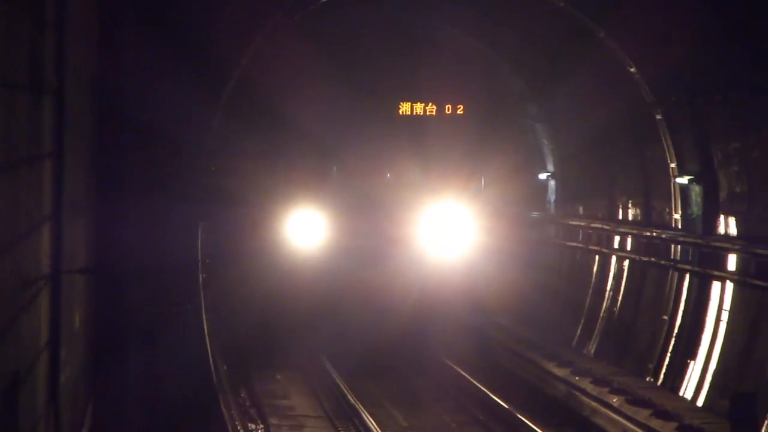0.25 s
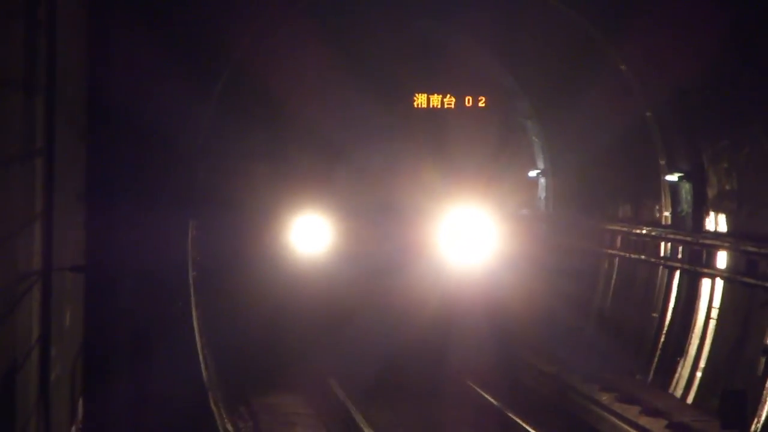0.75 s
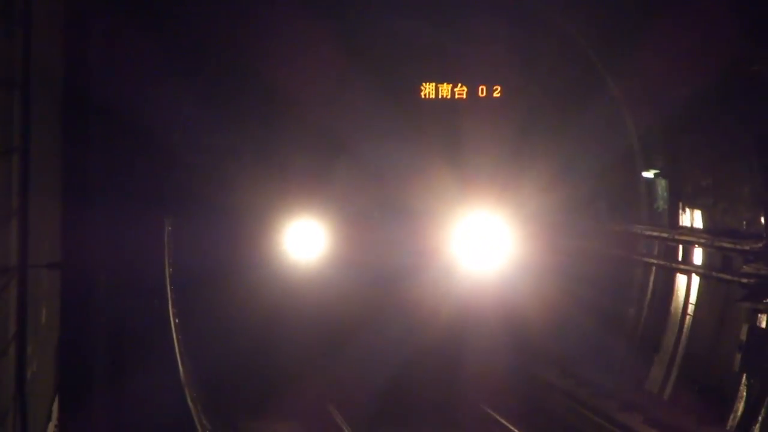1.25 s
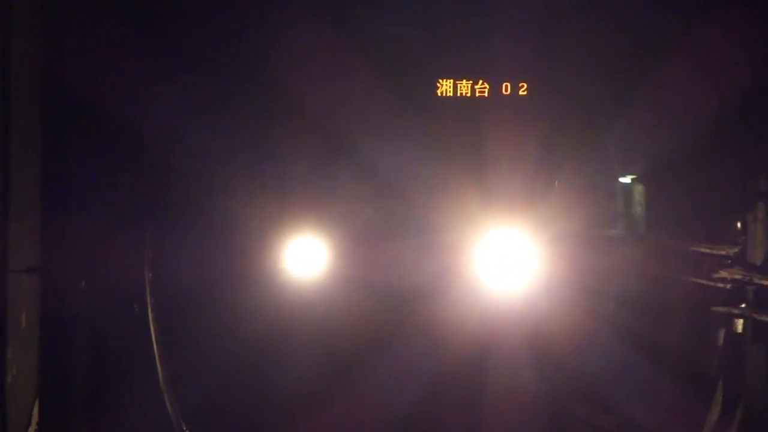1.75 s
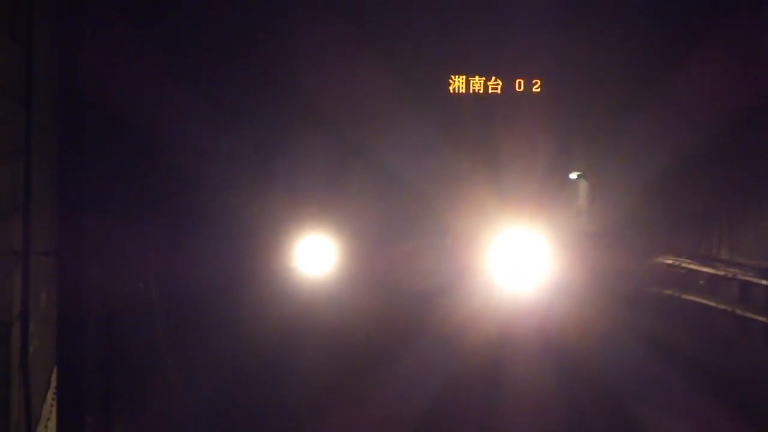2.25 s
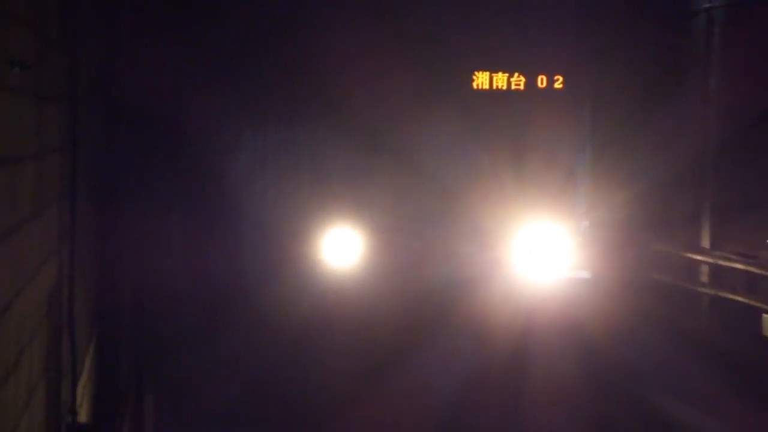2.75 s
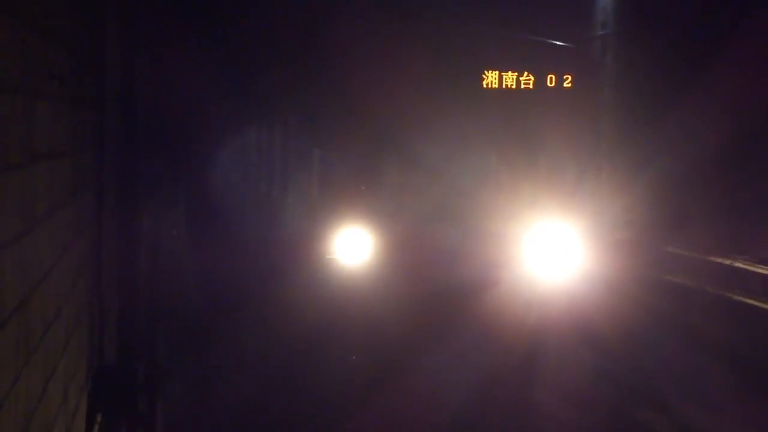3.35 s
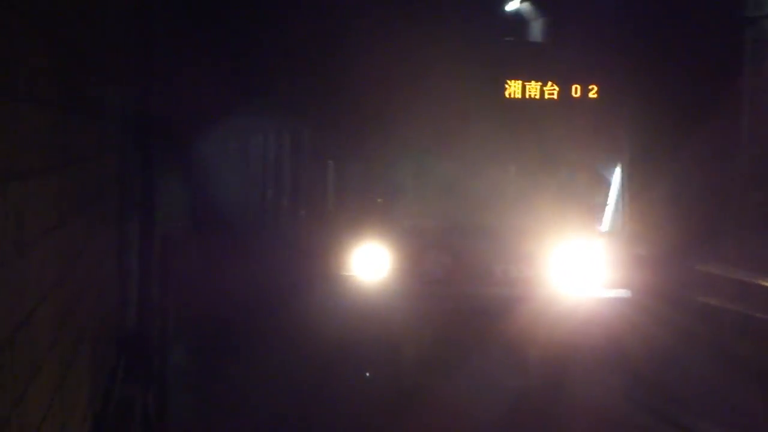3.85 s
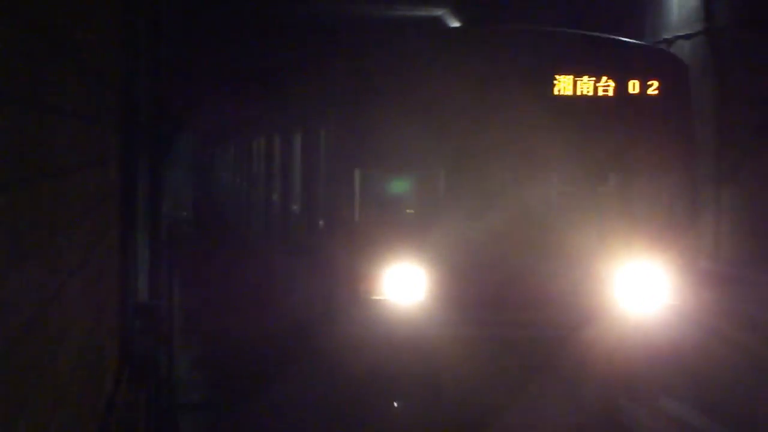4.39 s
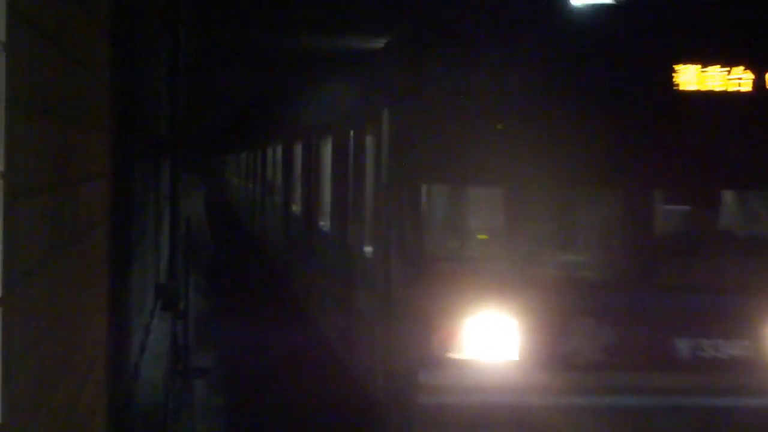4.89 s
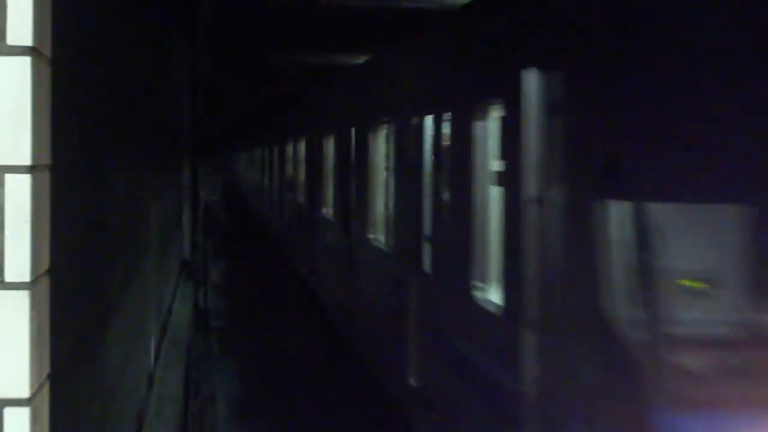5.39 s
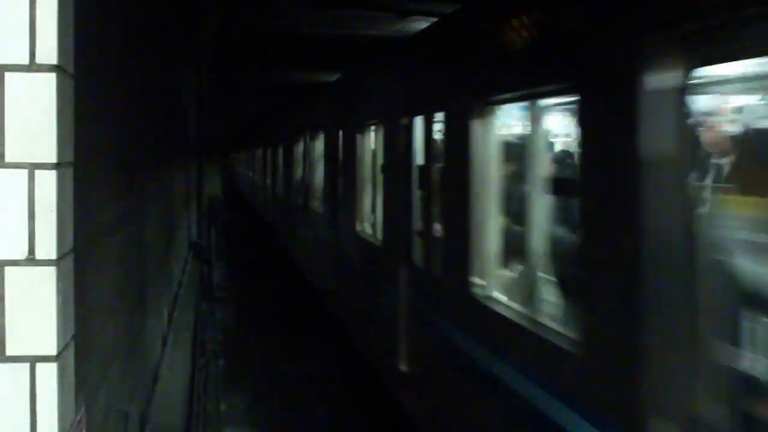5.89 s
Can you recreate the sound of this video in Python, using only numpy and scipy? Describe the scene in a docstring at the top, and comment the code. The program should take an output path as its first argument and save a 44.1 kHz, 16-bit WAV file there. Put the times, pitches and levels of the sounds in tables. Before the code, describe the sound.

An electric subway train approaches through a tunnel with a steady, hollow roar of wheels and ringing rails. Its motor whine sinks slightly as it slows, and the wheels knock now and then on rail joints. Near the end, as the first car passes, the brakes sizzle and chirp in quick high pulses. The microphone is at the end of the platform, buffeted throughout by irregular gusts of air.

```python
"""An underground station, at the end of the platform: an electric train rolls out of the tunnel.
Rough steel sets track, rails and wheels roaring and excites the tunnel's modes; wheels knock on joints.
The motor whine sinks as the train slows. Friction makes the brakes sizzle, and chirp once per wheel
turn, loudest as the first car goes by. Air pushed ahead of the train buffets the microphone, and
the strong gusts make its automatic gain control turn everything down."""
import sys
import numpy as np
from scipy import signal
from scipy.fft import rfft, irfft
from scipy.io import wavfile
from scipy.ndimage import uniform_filter1d

SR = 44100
rng = np.random.default_rng(int(sys.argv[2]) if len(sys.argv) > 2 else 0)


def materialize(psi):
    """Save the field psi as 16-bit PCM at rate SR to the path in sys.argv[1].

    A 1-D psi becomes a single channel; in a 2-D psi each row is a channel.
    """
    bounded = np.clip(np.atleast_2d(psi).T, -1, 1)
    quanta = np.round(bounded * 32767).astype(np.int16)
    wavfile.write(sys.argv[1], SR, quanta)


N = 270333
TIME = np.arange(N) / SR
FREQ = np.maximum(np.arange(N // 2 + 1) * SR / N, 1)


# spectrum of the rolling noise: (frequency [Hz], spectral level [dB])
ROAR_SPECTRUM = [(180, -19), (300, -15), (353, -9.5), (410, -11.5), (464, -6), (510, -6.5), (705, -4),
                 (813, -0.5), (920, -2), (1080, -2.5), (1210, -7.5), (1560, -10), (1870, -5.5),
                 (2380, -14.5), (2900, -30.5), (3770, -52), (6380, -120)]
def rolling(track_top_hz=720, rail_top_hz=1400, flutter_db=0.5):
    """Roughness excitation: the track bed radiates the lows, the rails the middle, the wheels the top."""
    roar = colour(ROAR_SPECTRUM, skirt_db=16) * tunnel()
    low, middle = below(track_top_hz), below(rail_top_hz)
    track = from_db(exposed_level(-7, 5.56)) * noise(roar * np.sqrt(low))
    rails = from_db(-2.5) * noise(roar * np.sqrt(middle * (1 - low)))
    wheels = from_db(exposed_level(-14.34, 7.8)) * noise(roar * np.sqrt(1 - middle)) * pan(-1)
    return (track + rails + wheels) * from_db(roar_level() + flutter_db * drift(27))


# slow course of the rolling noise: (time [s], level [dB])
ROAR_LEVELS = [(0, -16.5), (.22, -15), (.7, -15), (.9, -17.5), (1.2, -17), (2.0, -16.5), (2.3, -17.5),
               (2.65, -16), (3.2, -15), (3.55, -18), (4.1, -19.5), (4.35, -17.5), (4.65, -20.5),
               (5.35, -19.5), (6.13, -20)]
# patches of uneven rail: (time [s], level change [dB])
ROUGH_PATCHES = [(.69, -1), (1.19, 3.5), (1.66, 2), (1.941, 1.5), (2.41, 1.5), (3.84, 1), (4.36, -0.5),
                 (4.52, 1), (4.8, 3), (4.98, 1), (5.13, 1), (5.305, 2), (5.38, 1)]
def roar_level(half_length_s=0.043):
    """Rolling noise follows roughness: each patch briefly shifts its level, given in dB."""
    level, = in_time(ROAR_LEVELS)
    return level + sum(db * np.exp(-((TIME - s) / half_length_s) ** 2) for s, db in ROUGH_PATCHES)


# how openly the wheels are heard: (time [s], exposure [0-1])
WHEEL_EXPOSURE = [(0, 0.03), (2.4, 0.16), (3.4, 0.16), (3.9, 0.52), (4.35, 0.84), (4.7, 0.66), (5.05, 0.85),
                  (6.13, 0.88)]
def exposed_level(hidden_db, gained_db):
    """Exposure of a source: a level in dB that rises as the wheels are heard more openly."""
    exposure, = in_time(WHEEL_EXPOSURE)
    return hidden_db + gained_db * exposure


# cross modes of the tunnel: (frequency [Hz], bandwidth [Hz], gain [dB])
TUNNEL_MODES = [(232, 35, 3.5), (350, 20, 1.5), (459, 22, 0.5), (600, 110, 1.5), (808, 42, 2),
                (860, 55, 1.5), (1166, 61, 2), (2443, 190, 3.5)]
def tunnel():
    """Standing waves across the tube raise peaks in the echo-rippled frequency response."""
    return echoes() * from_db(sum(db * resonance(hz, width) for hz, width, db in TUNNEL_MODES))


# two groups of motors: (time [s], lower pitch [Hz], lower group level [dB], upper group level [dB])
MOTOR_WHINE = [(0, 815, -47, -52), (.65, 803, -33.5, -44), (1.2, 794, -37, -46), (2.3, 800, -35, -48),
               (2.7, 789, -28.5, -42), (3.4, 781, -32, -37), (3.9, 765, -28.5, -38), (4.6, 746, -33, -30.5),
               (5.4, 711.2, -34, -29.5), (6.13, 706, -32.5, -32)]
def motors(upper_ratio=1.117, gain_db=2.5):
    """Pitch is proportional to shaft speed: both groups sink together, and the upper one takes over."""
    hz, lower_db, upper_db = in_time(MOTOR_WHINE)
    lower = from_db(lower_db) * whine(hz, spread=.012, fading_hz=15)
    upper = from_db(upper_db) * whine(hz * upper_ratio, spread=.014, fading_hz=20)
    return from_db(gain_db) * (lower + upper)


def whine(hz, spread, fading_hz, count=3):
    """Multipath fading: tunnel echoes make the tones of slightly detuned motors swell and fade."""
    out = 0
    for offset in np.linspace(-1, 1, count):
        phase = 2 * np.pi * np.cumsum(hz * (1 + spread * offset)) / SR
        out += drift(fading_hz) * np.sin(phase) + drift(fading_hz) * np.cos(phase)
    return evened(np.array([out, out]), window_s=0.37)


# wheels striking rail joints: (time [s], level [dB], pitch [Hz])
JOINT_IMPACTS = [(1.198, -12.5, 850), (1.265, -13, 850), (3.229, -12.5, 721.5), (3.258, -14, 720),
                 (3.304, -16, 720), (3.35, -14, 800), (3.421, -13, 720), (3.832, -14, 730),
                 (3.943, -13, 760), (4.967, -15, 721), (5.088, -12, 710), (5.315, -10.5, 593.5),
                 (5.339, -18, 602), (5.697, -14, 720)]
def knocks(width_hz=600, attack_s=0.0022, decay_s=0.013):
    """Impact excitation: a wheel drops over a joint and rings with the track, heavily damped."""
    track = np.sqrt(colour(ROAR_SPECTRUM, skirt_db=26))
    out = 0
    for s, db, hz in JOINT_IMPACTS:
        age = np.maximum(TIME - s, 0)
        blow = from_db(db) * np.minimum(age / attack_s, 1) * np.exp(-age / decay_s)
        out += blow * evened(noise(resonance(hz, width_hz) * track), window_s=0.014)
    return out


# pressure of the eddies: (frequency [Hz], spectral level [dB])
WIND_SPECTRUM = [(15, -70), (25, -49), (54, -39), (92, -15), (149, -5), (230, -1), (366, -2.5), (697, -8.5),
                 (798, -11.5), (900, -12), (1170, -27), (1980, -120)]
# likeness of the wind in left and right: (frequency [Hz], correlation [-1 to 1])
WIND_CORRELATION = [(60, -0.15), (150, -0.76), (500, -0.38)]
def wind(gain_db=3.5, lumps_db=2.5, lumps_hz=30):
    """Turbulent pressure: eddies push the two microphone ports mostly in antiphase."""
    eddies = evened(noise(colour(WIND_SPECTRUM, skirt_db=16), WIND_CORRELATION), window_s=0.12)
    return airflow() * from_db(gain_db + lumps_db * drift(lumps_hz)) * eddies * pan(-1.86)


# gusts at the microphone: (start [s], duration [s], level [dB])
AIR_GUSTS = [(0.0, 0.037, -24), (0.3, 0.072, -29.5), (0.524, 0.08, -26), (0.793, 0.098, -22),
             (0.958, 0.042, -25), (1.302, 0.061, -30), (1.404, 0.033, -19.5), (1.535, 0.024, -21.5),
             (1.708, 0.058, -19), (1.905, 0.069, -31), (2.089, 0.034, -21), (2.199, 0.042, -17.5),
             (2.402, 0.034, -19.5), (2.527, 0.068, -29), (2.683, 0.059, -29), (3.04, 0.051, -33),
             (3.204, 0.031, -31), (3.37, 0.1, -29), (3.48, 0.11, -24.5), (3.676, 0.1, -29),
             (3.876, 0.024, -21.5), (4, 0.15, -25.5), (4.442, 0.042, -23.5), (4.528, 0.16, -20.5),
             (4.758, 0.034, -20.5), (4.827, 0.029, -25.5), (5.07, 0.18, -23.5), (5.336, 0.046, -22),
             (5.492, 0.065, -32.5), (5.705, 0.016, -29.5), (5.921, 0.12, -30)]
def airflow(draught_db=-40.5, attack_s=0.06, release_s=0.039):
    """Piston effect: the train drives gusts and a steady draught ahead of it; their powers add."""
    amplitude = from_db(draught_db)
    for start, length, db in AIR_GUSTS:
        attack = np.clip((TIME - start) / attack_s + 1, 0, 1)
        release = np.exp(-np.maximum(TIME - start - length, 0) / release_s)
        amplitude = np.hypot(amplitude, from_db(db) * attack * release)
    return amplitude


# rubbing of the brake shoes: (time [s], level [dB])
BRAKE_LEVELS = [(0.05, -64), (1.06, -63.5), (1.23, -60), (1.84, -59), (2.6, -53.5), (3.15, -50),
                (3.55, -58.5), (4.46, -56), (4.76, -51.5), (4.81, -41.5), (4.87, -43), (4.99, -39),
                (5.49, -40.5), (5.66, -37.5), (5.78, -37.5), (5.88, -37.5), (6.1, -37.5)]
# high modes of the shoes: (frequency [Hz], spectral level [dB])
SIZZLE_SPECTRUM = [(6500, -23.5), (7600, -7), (8300, -6), (9000, -2), (9600, 1), (10100, -4.5),
                   (10700, -17), (11400, -28)]
def brake_sizzle(walls, gain_db=4, grain_db=0.9):
    """Sliding friction drives the high modes of the brake shoes with grainy noise."""
    level, = in_time(BRAKE_LEVELS)
    envelope = from_db(level + gain_db + grain_db * drift(40))
    return envelope * noise(walls * colour(SIZZLE_SPECTRUM, skirt_db=50)) * pan(-1.6)


# chirping modes of the shoes: (frequency [Hz], bandwidth [Hz], lag [turns], level [dB])
CHIRP_MODES = [(7330, 600, 0.0, 3.5), (7800, 600, 0.28, -3.5), (9300, 770, 0.42, 3), (10260, 450, 0.5, -7)]
def brake_chirps(cycles_per_turn=142.5, catch_s=4.895, peak_turns=.22, slip_turns=.04, rise_per_s=.045):
    """Periodic friction: once per turn the wheel's high spot catches each mode of the shoes."""
    motor_hz, *_ = in_time(MOTOR_WHINE)
    braking_db, = in_time(BRAKE_LEVELS)
    turns = np.cumsum(motor_hz) / SR / cycles_per_turn
    turns -= np.interp(catch_s, TIME, turns)   # the high spot meets the shoe at catch_s
    climb = rise_per_s * np.maximum(TIME - catch_s, 0)   # the modes rise as the shoes press harder
    out = 0
    for hz, width_hz, lag, db in CHIRP_MODES:
        age = ((turns - lag + slip_turns * drift(8)) % 1) / peak_turns
        swell = (age * np.exp(1 - age)) ** 2
        mode = signal.hilbert(noise(resonance(hz, width_hz)))
        glide = np.exp(2j * np.pi * np.cumsum(hz * climb) / SR)
        out += from_db(db) * swell * np.real(mode * glide)
    level = braking_db + 0.27 * (braking_db - braking_db.max()) - 1   # grows faster than the sizzle
    roughness_db = drift(60)
    return out * from_db(level - roughness_db) * pan(-1.6)


# scrapes of the brakes: (time [s], pitch [Hz], bandwidth [Hz], duration [s], level [dB])
SCRAPE_MODES = [(1.35, 9800, 600, .25, -58), (2.88, 9650, 850, .65, -52.5), (4.15, 8550, 1200, .65, -51.5),
                (5.36, 4650, 350, .2, -50), (5.44, 2280, 260, .19, -31.5), (5.635, 9400, 600, .04, -36),
                (5.83, 9550, 600, .028, -35), (5.87, 4380, 800, .14, -47)]
def brake_scrapes(gain_db=2, rough_db=2.5):
    """Friction-excited resonance: now and then a single mode of the brakes swells unevenly."""
    out = 0
    for s, hz, width_hz, length, db in SCRAPE_MODES:
        out += from_db(db) * bell(s, length) * noise(resonance(hz, width_hz))
    return out * from_db(gain_db + rough_db * drift(60)) * pan(-2.2)


# ringing of the rails: (time [s], level [dB])
RING_LEVELS = [(0, -39), (.3, -28.5), (.7, -26), (.95, -31), (1.2, -34), (1.7, -40), (2.3, -25.5),
               (3.0, -27), (3.3, -35), (3.6, -35), (6.13, -31)]
def rail_ring(centre_hz=1040, width_hz=210):
    """The rails resonate between their fastenings; the tunnel, a waveguide, carries the ring ahead."""
    level, = in_time(RING_LEVELS)
    return from_db(level) * noise(resonance(centre_hz, width_hz) * echoes(strength=0.21))


# swelling tunnel modes: (time [s], pitch [Hz], duration [s], level [dB])
BOOM_MODES = [(.5, 472, 0.8, -34), (.65, 1050, 0.83, -27.5), (1.652, 356, 0.42, -35), (1.8, 232, 0.84, -38),
              (2.003, 476, 0.25, -29.5), (3.003, 326, 0.49, -34), (3.55, 475, 0.45, -30.5),
              (3.865, 673, 0.43, -26.5), (4.55, 335, 0.32, -31.5)]
def tunnel_booms(width_hz=23):
    """A source moving along a tube excites one narrow resonance after another."""
    out = 0
    for s, hz, length, db in BOOM_MODES:
        out += from_db(db) * bell(s, length) * evened(noise(resonance(hz, width_hz)), window_s=0.59)
    return out


# hiss of the wheel treads: (frequency [Hz], spectral level [dB])
TREAD_SPECTRUM = [(2800, 2), (3500, 3.5), (4400, 5), (5000, 1), (5700, 5), (6800, 6), (8200, -5.5),
                  (9500, -7.5), (11000, -21.5)]
def tread_hiss(walls, follows_roar=0.5):
    """Contact friction: the treads hiss, louder when heard openly and partly in step with the roar."""
    roar_db = roar_level()
    level = exposed_level(-51.5, 14.7) + follows_roar * (roar_db - roar_db.mean())
    return from_db(level) * noise(walls * colour(TREAD_SPECTRUM, skirt_db=20.5)) * pan(.3)


# hiss of the rails: (frequency [Hz], spectral level [dB])
RAIL_HISS_SPECTRUM = [(2800, -3), (3500, 2.5), (4500, -3), (5500, -2.5)]
def rail_hiss(share_db=-35):
    """The finest roughness excites the highest frequencies: the rails hiss in step with the roar."""
    return from_db(roar_level() + share_db) * noise(colour(RAIL_HISS_SPECTRUM, skirt_db=35)) * pan(.3)


def echoes(strength=0.04, first_s=.012, last_s=.09, count=14):
    """Comb filtering: wall echoes interfere with the direct sound and ripple its spectrum."""
    delays = rng.uniform(first_s, last_s, (count, 1))
    return np.abs(1 + strength * np.exp(-2j * np.pi * FREQ * delays).sum(axis=0))


# crackles of the buffeted microphone: (time [s], level [dB], time constant [s])
MICROPHONE_CRACKLES = [(1.42, -42, .005), (2.056, -44, .005), (2.206, -42, .004), (3.275, -32, .001),
                       (3.876, -41, .003), (3.889, -46, .003), (4.468, -38, .003)]
def crackles(top_hz=3800):
    """Transients in the wind: brief bursts of low-passed noise sound as dull spits."""
    bursts = sum(from_db(db) * np.exp(-np.abs(TIME - s) / tau) for s, db, tau in MICROPHONE_CRACKLES)
    return bursts * noise(below(top_hz, order=2))


def gain_control(x, threshold_db=-11.5, share=0.29, bass_db=18.5, window_s=0.0049, release_db_per_s=70):
    """Compression: the level detector is most sensitive to bass, so strong gusts duck the train."""
    sensed = irfft(rfft(x) * (1 + from_db(bass_db) * below(200, order=2)), N)
    over_db = np.maximum(10 * np.log10(running_power(sensed, window_s) + 1e-12) - threshold_db, 0)
    release_db = release_db_per_s * TIME
    held_db = np.maximum.accumulate(over_db + release_db) - release_db
    return x * from_db(-share * held_db)


# likeness of the train's sound in left and right: (frequency [Hz], correlation [-1 to 1])
TRAIN_CORRELATION = [(200, 0.83), (450, 1), (700, 1), (1000, 0.97), (2200, 0.9), (3300, 0.61), (5000, 0.57),
                     (7000, 0.38), (9500, -0.085)]
def noise(gain, correlation=TRAIN_CORRELATION):
    """Coloured stereo noise of rms 1; the balance of mid and side sets its correlation."""
    alike = np.clip(over_hz(correlation), -.99, .99)
    mid, side = rfft(rng.standard_normal((2, N))) * gain
    mid, side = np.sqrt(1 + alike) * mid, np.sqrt(1 - alike) * side
    return rms_one(irfft(np.array([mid + side, mid - side]), N))


def drift(rate_hz):
    """Random modulation: low-passed noise of rms 1."""
    return rms_one(irfft(rfft(rng.standard_normal(N)) * below(rate_hz, order=2), N))


def colour(points, skirt_db):
    """Spectral envelope as a gain, falling by skirt_db per octave beyond its ends."""
    octaves_outside = np.abs(np.log2(FREQ / np.clip(FREQ, points[0][0], points[-1][0])))
    return from_db(over_hz(points) - skirt_db * octaves_outside)


def resonance(hz, width_hz):
    """Resonance curve of a damped oscillator, 1 at its peak."""
    return 1 / (1 + (2 * (FREQ - hz) / width_hz) ** 2)


def below(hz, order=8):
    """Power response of a maximally flat low-pass."""
    return 1 / (1 + (FREQ / hz) ** (2 * order))


def bell(centre_s, length_s):
    """Bell-shaped envelope, 1 at its centre."""
    return np.exp(-2 * ((TIME - centre_s) / length_s) ** 2)


def evened(x, window_s):
    """Division by the running rms removes chance swells."""
    return x / np.sqrt(running_power(x, window_s) + 1e-6)


def running_power(x, window_s):
    """Mean square of both channels over a sliding window."""
    return np.abs(uniform_filter1d(np.mean(x ** 2, axis=0), int(window_s * SR)))


def in_time(rows):
    """Linear interpolation of each column over time."""
    s, *columns = np.transpose(rows)
    return [np.interp(TIME, s, column) for column in columns]


def over_hz(points):
    """Linear interpolation over log frequency."""
    hz, value = np.transpose(points)
    return np.interp(np.log(FREQ), np.log(hz), value)


def pan(left_db):
    """Channel gains for a level difference, left minus right."""
    return from_db(np.array([[left_db], [-left_db]]) / 2)


def rms_one(x):
    """Normalisation to rms 1."""
    return x / np.sqrt(np.mean(x ** 2) + 1e-20)


def from_db(db):
    """Decibels to amplitude ratio."""
    return 10 ** (np.asarray(db) / 20)


def scene():
    """Superposition of the train, somewhat to the right, and the wind it drives out of the tunnel."""
    train = (rolling() + rail_ring() + tunnel_booms() + knocks() + motors()) * pan(-4) + rail_hiss()
    walls = echoes(strength=0.074)
    friction = tread_hiss(walls) + brake_sizzle(walls) + brake_chirps() + brake_scrapes()
    return train + friction + wind()


# notches of the microphone's preamplifier: (frequency [Hz], bandwidth [Hz])
PREAMP_NOTCHES = [(3010, 415), (4010, 1050), (5020, 730)]
def record(dry, cutoff_hz=11200):
    """Signal chain: compression, notches in the lower treble, faint crackles and a steep low-pass."""
    x = gain_control(dry)
    for hz, width_hz in PREAMP_NOTCHES:
        x = signal.lfilter(*signal.iirnotch(hz, hz / width_hz, fs=SR), x)
    low_pass = signal.ellip(10, .2, 90, cutoff_hz, fs=SR, output="sos")
    return signal.sosfilt(low_pass, x + crackles())


dry = scene()
out = record(dry)
materialize(out)
```